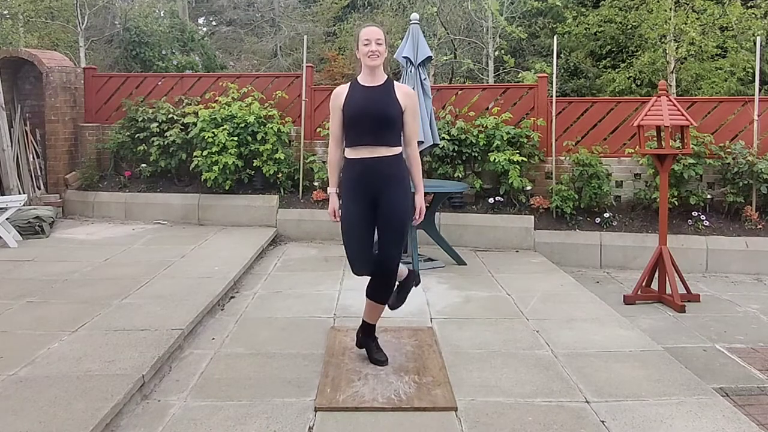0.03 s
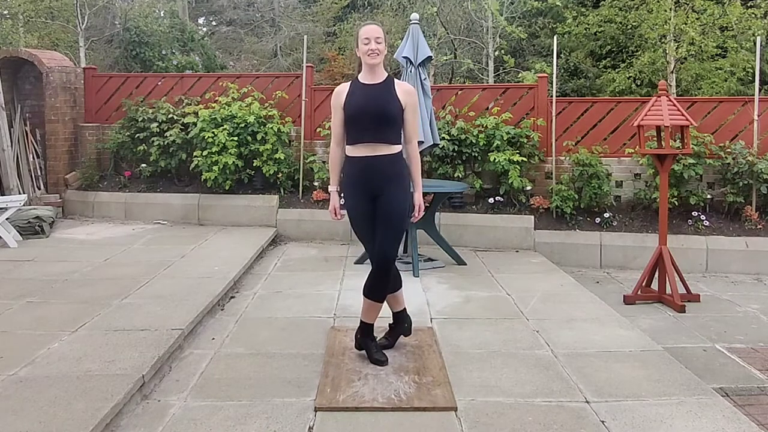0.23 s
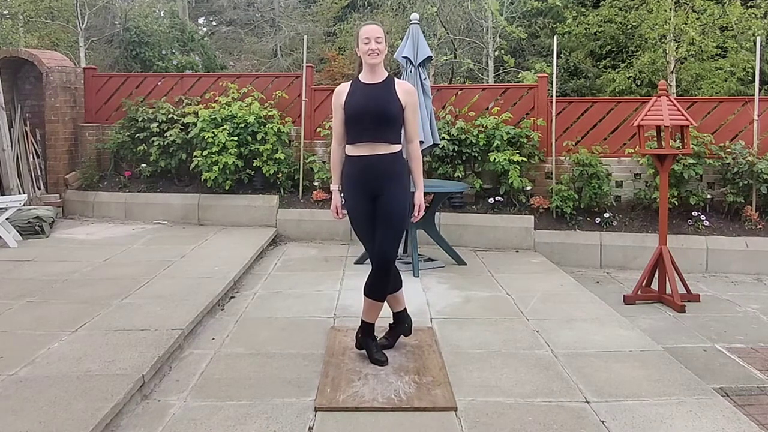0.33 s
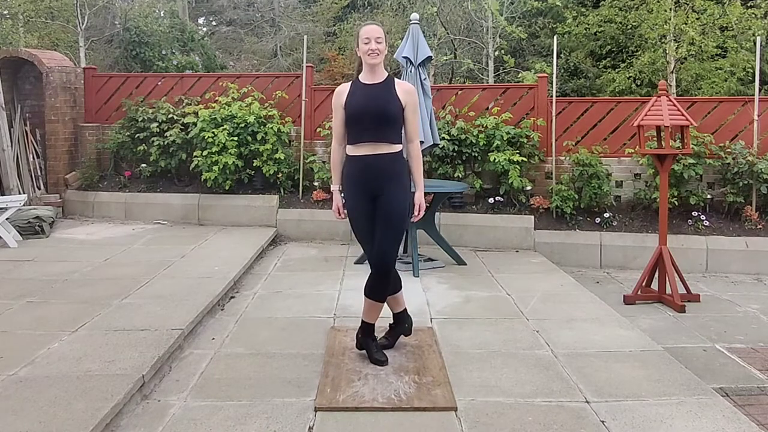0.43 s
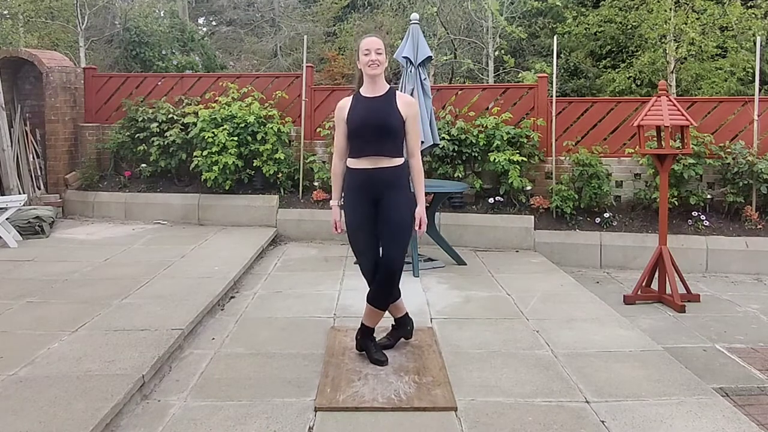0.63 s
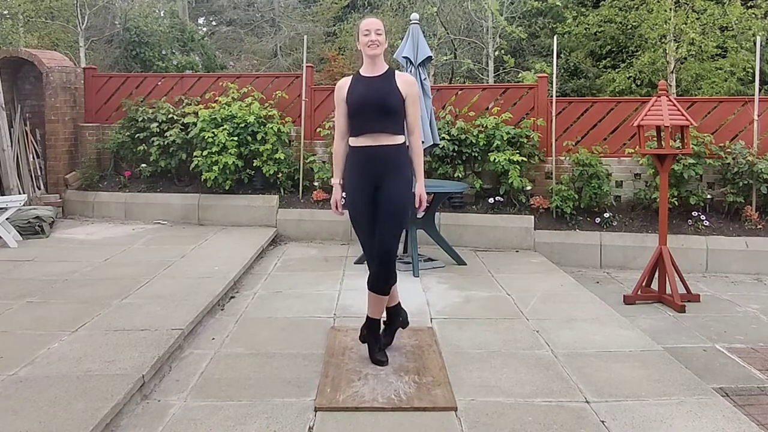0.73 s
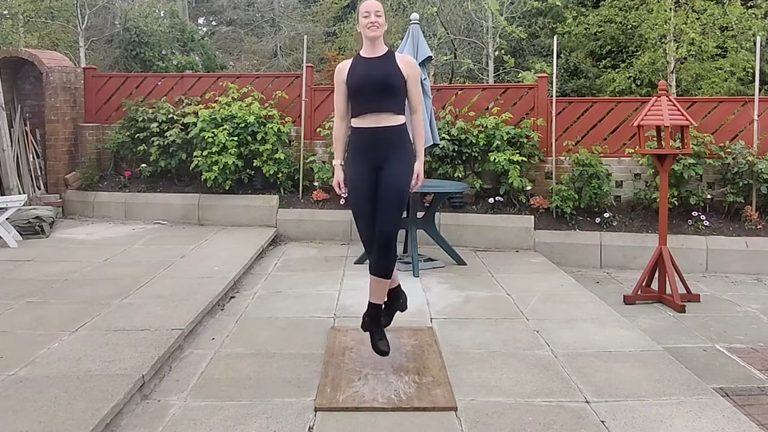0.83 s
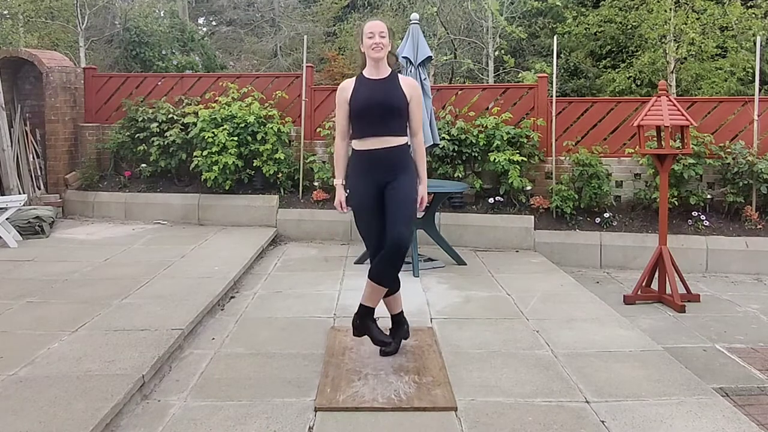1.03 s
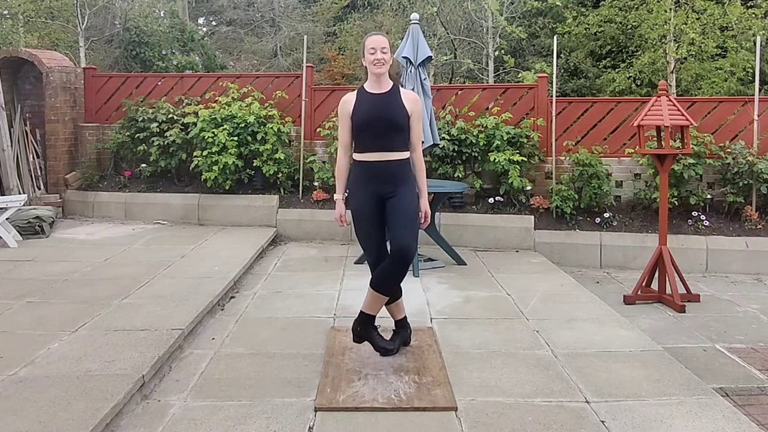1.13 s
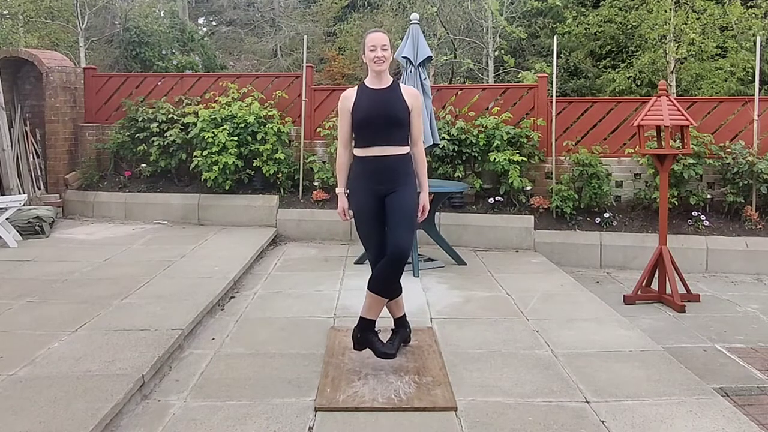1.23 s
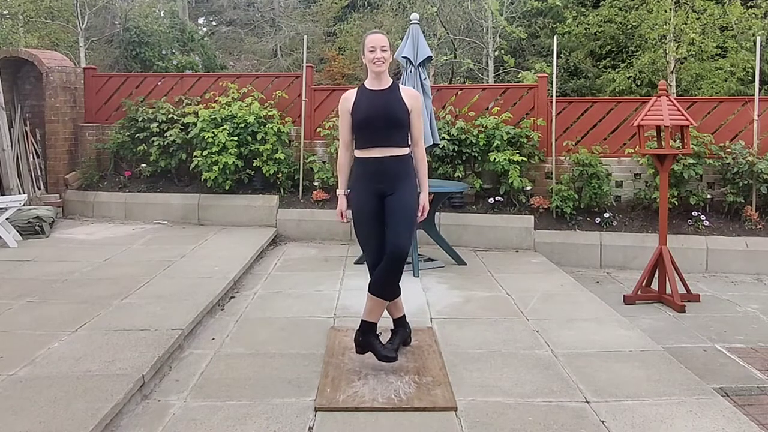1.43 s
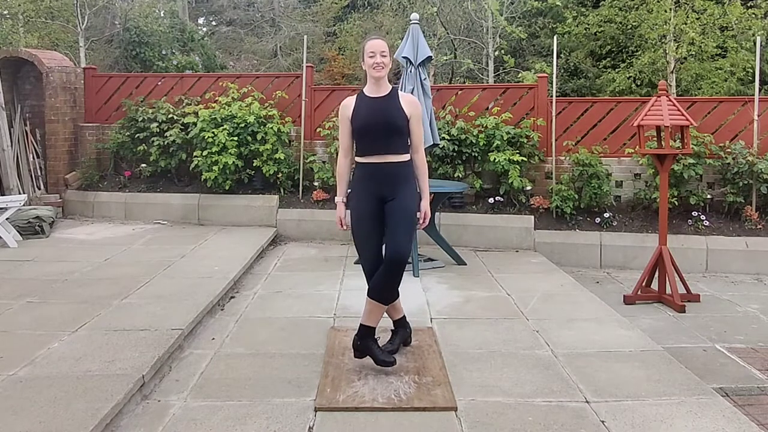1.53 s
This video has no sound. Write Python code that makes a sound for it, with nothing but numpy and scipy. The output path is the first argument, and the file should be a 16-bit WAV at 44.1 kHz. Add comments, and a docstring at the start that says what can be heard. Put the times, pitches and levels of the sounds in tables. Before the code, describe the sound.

Hard dance shoes stamp twice on a wooden board, about a second apart, each a sharp crack with a short woody knock. The stamps echo briefly around a patio, over faint outdoor hiss and a distant engine drone.

```python
"""A dancer in hard shoes stamps on a wooden board laid on a walled patio.
The echo of one stamp is already dying away, over a far-off engine drone and a faint outdoor hiss.
At 0.2 s a shoe ticks and stamps: a sharp crack of the tip and a short knock of the ringing board,
thrown back by paving, walls and fence. A lighter tick follows while the engine slowly sags.
At 1.1 s the dancer stamps on another spot of the board, and the engine drops to a slower pace."""
import sys
import numpy as np
from scipy import signal
from scipy.fft import rfft, irfft
from scipy.io import wavfile

SR = 44100
rng = np.random.default_rng(int(sys.argv[2]) if len(sys.argv) > 2 else 0)


def to_wav(s):
    """Save 16-bit WAV."""
    ch = np.atleast_2d(s).T  # columns
    pcm = np.round(np.clip(ch, -1, 1) * 32767)  # PCM
    wavfile.write(sys.argv[1], SR, pcm.astype(np.int16))


N = 70560
LEAD_S = .2   # pre-roll, so a stamp can land before the scene opens
LEAD = int(LEAD_S * SR)

# the stamps: start_s, knock_db, crack_db, crack_tilt_db_per_octave, settle_db, scatter_db, spot (0 or 1)
STAMPS = [(-0.072, -14, 5.5, -4.5, 0, -3.5, 1), (0.2082, -2.5, 3.5, -2.1, -2, 1.5, 0),
          (1.1029, -3, 1, -3, 7, .5, 1)]


def from_db(db):
    """Decibels to gain."""
    return 10 ** (np.asarray(db) / 20)


def at_hz(curve, hz):
    """Read a curve of (frequency, value) points on a log-frequency axis."""
    curve = np.array(curve)
    return np.interp(np.log(np.maximum(hz, 1)), np.log(curve[:, 0]), curve[:, 1])


def decay(t, t60_s):
    """Exponential fade, 60 dB down after t60_s."""
    return np.exp(-np.log(1000) * t / t60_s)


def noise(colour, size, tilt_db_per_octave=0):
    """Noise of a given colour, rms 1."""
    hz = np.maximum(np.fft.rfftfreq(size, 1 / SR), 1)
    gain = from_db(at_hz(colour, hz) + tilt_db_per_octave * np.log2(hz))
    wave = irfft(gain * np.exp(2j * np.pi * rng.random(len(hz))), size)
    return wave / wave.std()


def add(track, start_s, sound):
    """Lay a sound on a track that begins with the pre-roll."""
    i = max(int((start_s + LEAD_S) * SR), 0)
    track[i:i + len(sound)] += sound[:len(track) - i]


def tip_crack(t, tilt_db_per_octave, settle_db, settle_s=.0022, rise_s=.00061):
    """The hard tip cracks twice: its edge hits, then the rest settles just after."""
    # colour of the crack: frequency_hz, density_db
    colour = [(60, -16), (160, -4), (270, -12), (400, -8), (900, -0.5), (1600, 1.5), (2800, -5),
              (4200, -13), (6000, -17), (8500, -29), (11000, -33.5), (14500, -30)]
    ages = np.maximum([t, t - settle_s], 0)
    edge, rest = (1 - np.exp(-ages / rise_s)) * decay(ages, t60_s=.021)
    return noise(colour, len(t), tilt_db_per_octave) * np.hypot(edge, from_db(settle_db) * rest)


def board_knock(t, spot):
    """The struck board rings in its modes; the spot sets how strongly each one speaks."""
    # modes of the board: pitch_hz, t60_s, spot_0_db, spot_1_db
    modes = [(364, 0.18, -30.5, -29), (462, 0.065, -46, -15.5), (550, 0.06, -31, -11),
             (577.4, 0.038, -2, -33), (711, 0.028, -6.5, -5), (1017, 0.022, -15, -15.5),
             (1099, 0.05, -19, -10.5), (1338, 0.11, -22, -23), (1492, 0.031, -13.5, -13),
             (1650, 0.02, -23, -11.5), (2230, 0.016, -49, -5), (2794, 0.013, -15.5, -9.5),
             (3440, 0.0093, -57, -15.5), (4240, 0.015, -25.5, -19)]
    ring = sum(from_db(spot_db[spot]) * decay(t, t60_s) * np.sin(2 * np.pi * pitch_hz * t)
               for pitch_hz, t60_s, *spot_db in modes)
    # the small board radiates little bass, and the shoe is too soft to drive its top end
    low_hz, high_hz = 340, 5200
    return signal.sosfilt(signal.butter(4, [low_hz, high_hz], "band", fs=SR, output="sos"), ring)


def stamps():
    """Each stamp cracks the shoe's tip on the board and sets the wood ringing."""
    track, t = np.zeros(LEAD + N), np.arange(SR // 2) / SR
    for start_s, knock_db, crack_db, tilt, settle_db, _, spot in STAMPS:
        crack = from_db(crack_db - 15.5) * tip_crack(t, tilt, settle_db)
        knock = from_db(knock_db) * board_knock(t, int(spot))
        add(track, start_s, crack - knock)
    return track


def scatter(spot, predelay_s=.002, rise_s=.0061):
    """The wash of echoes after a stamp: a quick flurry from nearby, then a tail whose top dies first."""
    # reverb bands of the patio: centre_hz, spot_0_density_db, spot_1_density_db, t60_s
    bands = [(110, -34, -23, 0.3), (200, -10, -5.5, .4), (270, -14, -22, 0.36), (400, -6.5, -6, 0.3),
             (473, -7, -7, 0.31), (600, 5, -0.5, 0.35), (730, -4, -6, 0.39), (1180, -13, -10, 0.32),
             (1610, -10.5, -5.5, 0.34), (2700, -17.5, -12, 0.33), (3800, -23.5, -16, 0.32),
             (5460, -28, -23.5, 0.32), (8100, -35, -31, 0.24), (10300, -41.5, -39.5, 0.23),
             (14500, -45, -44.5, 0.2)]
    centres_hz, *colours, tails_s = np.transpose(bands)
    size = SR * 2 // 3
    t, hz = np.arange(size) / SR, np.fft.rfftfreq(size, 1 / SR)
    spectrum = rfft(noise(np.c_[centres_hz, colours[spot]], size))
    flurry, wash = decay(t, t60_s=.16), 0
    for share, tail_s in zip(np.eye(len(bands)), tails_s):
        band = irfft(spectrum * at_hz(np.c_[centres_hz, share], hz), size)
        wash += band * np.hypot(flurry, decay(t, tail_s))
    return wash * (1 - np.exp(-np.maximum(t - predelay_s, 0) / rise_s))


def patio(direct, channel):
    """One ear (0 left, 1 right) hears the shoes, slaps off paving, walls and fence, and its own wash."""
    # distinct reflections: delay_s, left_db, right_db, right_lag_s
    echoes = [(.0058, -13.5, -6.5, -.0002), (.0106, -9.5, -7, .0002), (.0225, -19, -23, -.0002)]
    heard = direct.copy()
    for delay_s, *level_db, right_lag_s in echoes:
        add(heard, delay_s + channel * right_lag_s - LEAD_S, from_db(level_db[channel]) * direct)
    for start_s, *_, scatter_db, spot in STAMPS:
        add(heard, start_s, from_db(scatter_db - 19.5) * scatter(int(spot)))
    return heard[LEAD:]


def engine(waver_db=1.85):
    """A distant, wavering exhaust note that sags slowly, then drops as the engine changes pace."""
    # the engine's pace and tone: time_s, firing_hz, odd_harmonics_db, even_harmonics_db
    pace = [(0, 32.3, -2.5, 1), (0.599, 30.7, -2, -1), (1.02, 29.8, -5, -1.5), (1.09, 29.5, -2, -9),
            (1.158, 27.4, 1.5, 11), (1.279, 20, -4.5, 5), (1.38, 19, -4, 3.5), (1.52, 18.1, -15.5, 10.5),
            (1.6, 19.6, 2.5, -3)]
    # partials of the exhaust note: harmonic, level_db
    exhaust = [(1, -42), (2, -48.5), (3, -44.5), (4, -55.5), (5, -55.5), (7, -66), (8, -70.5), (10, -69)]
    times_s, *curves = np.transpose(pace)
    t = np.arange(N) / SR
    firing_hz, odd_db, even_db = [np.interp(t, times_s, curve) for curve in curves]
    phase, drone = 2 * np.pi * np.cumsum(firing_hz) / SR, 0
    for harmonic, level_db in exhaust:
        waver = np.interp(t, np.linspace(0, t[-1], 20), rng.standard_normal(20))
        rms = from_db(level_db + (odd_db if harmonic % 2 else even_db) + waver_db * waver)
        drone += rms * np.sin(harmonic * phase + 2 * np.pi * rng.random())
    return np.sqrt(2) * drone


def outdoor_air():
    """A steady bed of rumble and hiss, centred in the bass and wide in the treble."""
    # colour of the air: frequency_hz, density_db
    colour = [(15, 18), (45, 12), (90, 16), (180, -1.5), (350, -4), (700, -4.5), (1500, -9.5), (3000, -16),
              (6000, -22), (8000, -30), (14500, -29)]
    # likeness of left and right: frequency_hz, correlation
    likeness = [(60, 0.9), (300, 0.93), (800, 0.22), (2500, 0.16), (12000, 0.067)]
    correlation = at_hz(likeness, np.fft.rfftfreq(N, 1 / SR))
    mid = irfft(rfft(noise(colour, N)) * np.sqrt((1 + correlation) / 2), N)
    side = irfft(rfft(noise(colour, N)) * np.sqrt((1 - correlation) / 2), N)
    return from_db(-48.5) * np.array([mid + side, mid - side])


def shoe_ticks():
    """Light touches of the shoes between stamps, each a tiny burst of bright noise."""
    # the touches: start_s, level_db
    touches = [(0.1935, -46), (0.5199, -55.5)]
    # colour of a tick: frequency_hz, density_db
    colour = [(500, 2), (2000, 11.5), (5000, 3), (9000, -0.5), (15000, -5)]
    track, t = np.zeros(LEAD + N), np.arange(SR // 2) / SR
    for start_s, level_db in touches:
        add(track, start_s, from_db(level_db) * noise(colour, len(t)) * decay(t, t60_s=.017))
    return track


def scene(lean_left_db=.54):
    """The shoes heard across the patio, over engine and air."""
    shoes = stamps() + shoe_ticks()
    dance = np.array([patio(shoes, channel) for channel in range(2)])
    return (dance + engine() + outdoor_air()) * from_db([[lean_left_db], [-lean_left_db]])


def record(dry):
    """Soft saturation rounds the highest peaks, and a steep low-pass cuts the very top."""
    ceiling, cutoff_hz = 1.2, 15600
    rounded = ceiling * np.tanh(dry / ceiling)
    return signal.sosfilt(signal.cheby2(18, 50, cutoff_hz, fs=SR, output="sos"), rounded)


dry = scene()
out = record(dry)
to_wav(out)
```